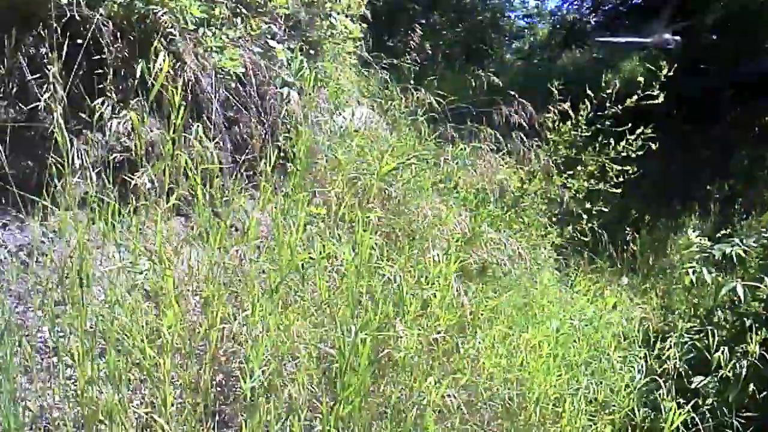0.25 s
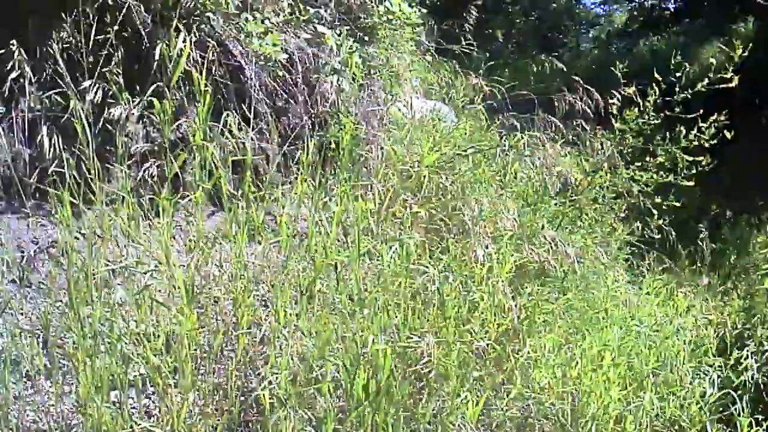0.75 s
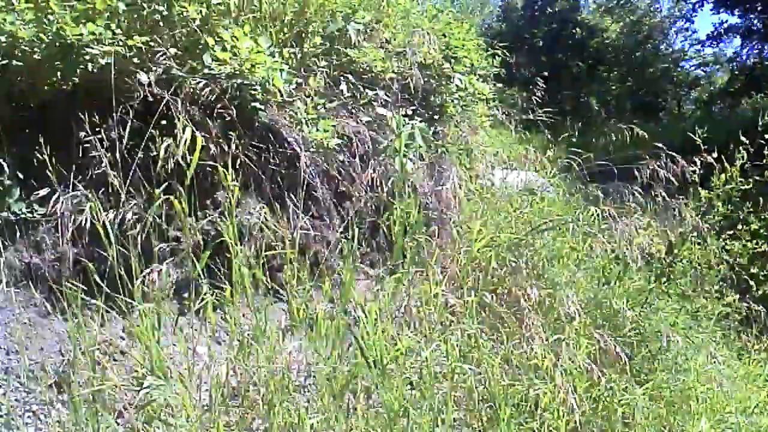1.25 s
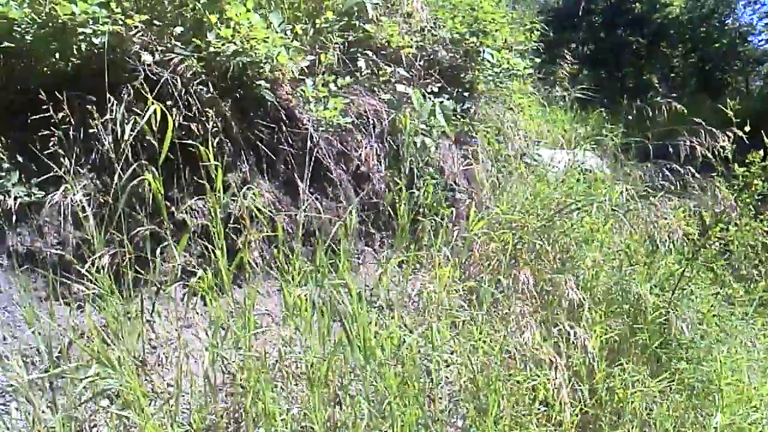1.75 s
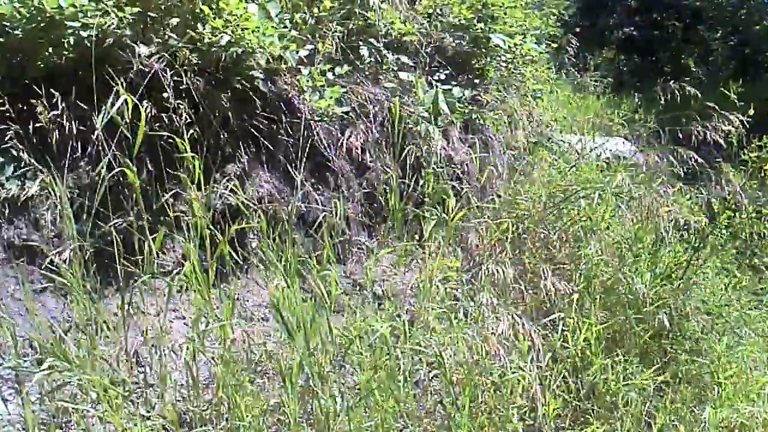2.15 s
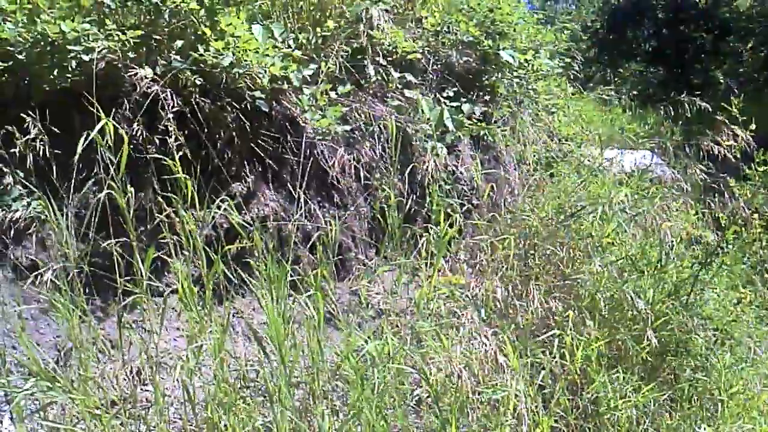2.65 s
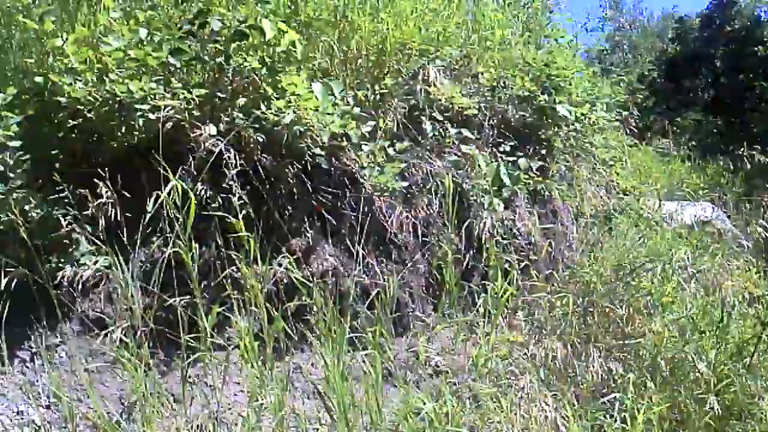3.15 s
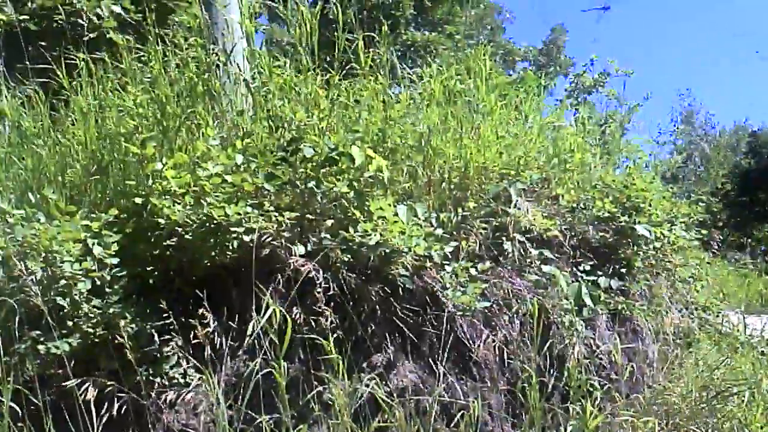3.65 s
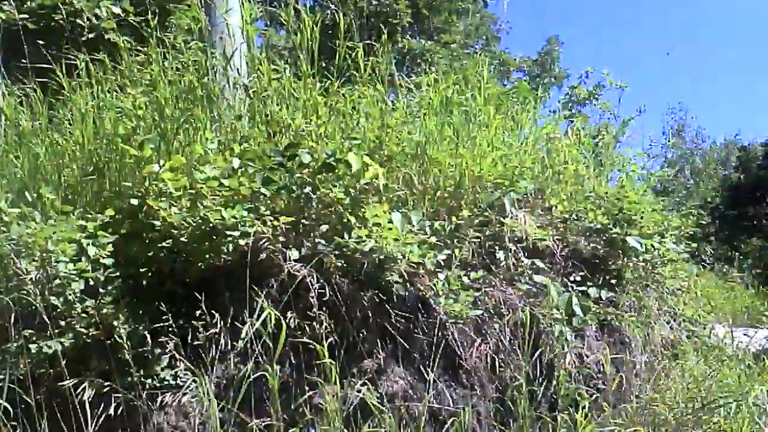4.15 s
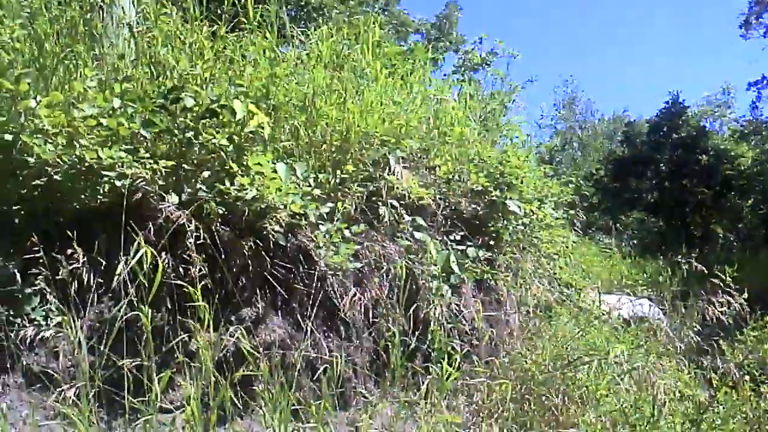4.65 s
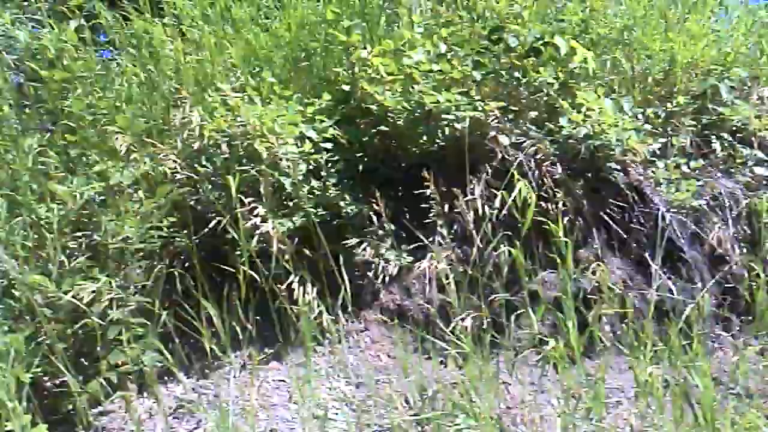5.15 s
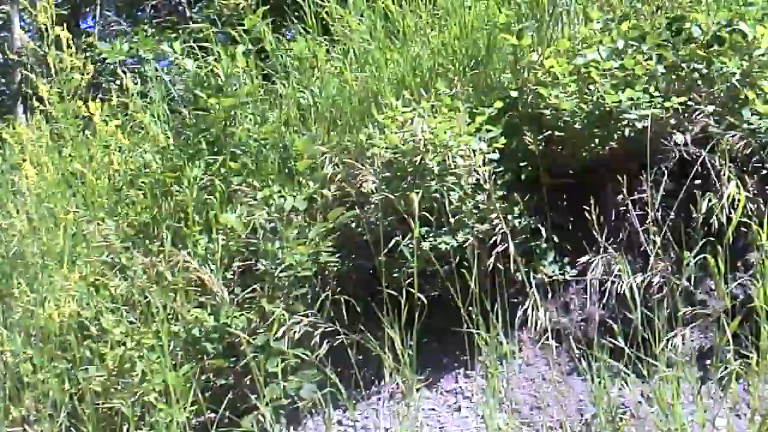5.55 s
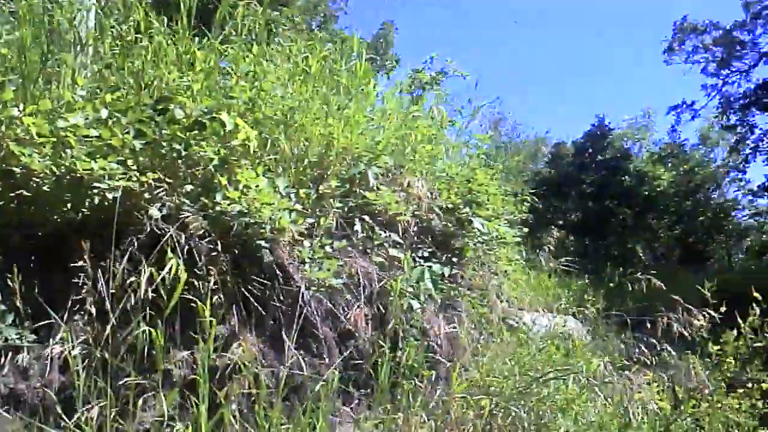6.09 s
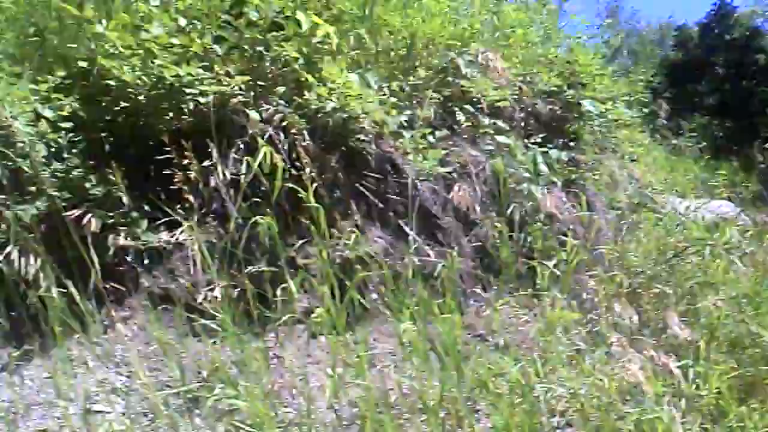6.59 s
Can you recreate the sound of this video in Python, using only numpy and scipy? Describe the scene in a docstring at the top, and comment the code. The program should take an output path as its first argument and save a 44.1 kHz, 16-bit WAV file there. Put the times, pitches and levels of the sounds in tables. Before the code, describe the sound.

Someone walks slowly through tall grass close to the microphone. Blades swish against trouser legs, stems crunch underfoot and dry stalks snap, mostly in the first two seconds. The steps pause while two small birds twitter faintly in the trees, then resume more softly. A faint machine hum lies under the outdoor air, and puffs of wind rumble on the microphone, strongest at the very end.

```python
"""Slow steps through tall grass

Summer grass swishes and crackles against the legs, feet crush stems, and dry stalks snap.
Two small birds twitter in the trees, and a faint machine hum lies under the outdoor air.
Puffs of wind rumble on the microphone, strongest at the very end."""
import sys
import numpy as np
from scipy import signal
from scipy.fft import rfft, irfft, next_fast_len
from scipy.io import wavfile
from scipy.ndimage import uniform_filter1d, map_coordinates

SR = 44100
rng = np.random.default_rng(int(sys.argv[2]) if len(sys.argv) > 2 else 0)


def generate_wav(sig):
    """Save sig (samples, or channels by samples) to the path in sys.argv[1] as 16-bit PCM at SR."""
    pcm = np.round(np.clip(np.atleast_2d(sig).T, -1, 1) * 32767).astype(np.int16)
    wavfile.write(sys.argv[1], SR, pcm)


N = 300850
TOP_HZ = 16000  # the highest sound let through

# how alike left and right are, where 1 means the same: frequency_hz, likeness
STEREO_LIKENESS = [(100, 1), (500, .975), (1000, .99), (2000, .997), (4000, .89), (8000, .86), (15000, .88)]
# the tone of the outdoor air: frequency_hz, gain_db
AIR_SPECTRUM = [(8, 13.5), (30, 1.5), (70, 6), (130, 1.5), (260, -1.5), (480, 0.5), (750, -6.5),
                (1400, -11.5), (2400, -16), (4000, -15.5), (6000, -19.5), (9000, -22.5), (16000, -27.5)]
# the motor's steady tones: pitch_hz, level_db
HUM_TONES = [(26.2, -54), (58.8, -48), (78.6, -60.5), (131, -58.5), (157.3, -63), (183.5, -68),
             (209.7, -65.5), (223.8, -65), (262, -71), (335.5, -70), (822, -76.5), (1467, -78)]
# one more motor tone that comes and goes: time_s, level_db
DRONE_LEVELS = [(0.0, -53.5), (0.46, -50), (0.8, -67.5), (2.07, -51), (2.37, -55.5), (3.22, -49),
                (3.87, -69), (4.02, -53), (4.35, -66), (5.08, -49.5), (5.59, -62), (5.72, -55.5),
                (6.65, -50.5)]
# the light breeze under the puffs: time_s, level_db
BREEZE_LEVELS = [(0, -47.5), (1.5, -46.5), (3.3, -50), (4.5, -53.5), (4.9, -58), (5.8, -43.5),
                 (6.82, -47.5)]
# puffs of wind: peak_s, rise_s, hold_s, fall_s, level_db
WIND_PUFFS = [(.76, .2, 0.21, 0.39, -40), (4.28, 0.42, 0.24, .2, -47), (5.16, .11, 0.18, 0.18, -33),
              (5.45, 0.067, .02, 0.18, -34), (5.73, 0.12, 0.025, 0.078, -34), (6.35, 0.13, 0.016, .1, -38),
              (6.8, 0.12, 0.045, 0.11, -16)]
# the deep rumble of wind on the microphone: frequency_hz, gain_db
WIND_SPECTRUM = [(4, -22), (12, -5), (28, 0), (48, -4), (80, -17), (140, -31), (400, -50), (1500, -72),
                 (5000, -110)]
# how long the trees' echo takes to fade by 60 dB: frequency_hz, fade_s
TREE_ECHO = [(500, .3), (4000, 0.4), (10000, 0.34)]
# the songbird's syllables, by name: length_s, pitches_hz (evenly spaced in time)
BIRD_SYLLABLES = {"chip": (.026, [5050, 4680, 4270]), "swoop": (.056, [5800, 5300, 3500]),
                  "lift": (.046, [3450, 4020, 4280]), "tsee": (.042, [6900, 5800, 5540, 5540]),
                  "tew": (.05, [4700, 4280, 3200]), "whistle": (.058, [4850, 5030, 4970]),
                  "pip": (.03, [5900, 6200, 6100]), "peep": (.025, [6200, 6450, 6550]),
                  "tsip": (.045, [5850, 5170, 4800])}
# its song, in runs of one syllable: start_s, count, period_s, level_db, syllable
BIRD_SONG = [(1.003, 2, .115, -50.5, "pip"), (2.753, 3, 0.2, -53, "chip"), (2.789, 3, 0.2, -53.5, "swoop"),
             (2.844, 3, .205, -56.5, "lift"), (3.406, 2, 0.11, -53, "tsee"), (3.585, 3, 0.16, -56, "tew"),
             (3.649, 2, 0.16, -53, "whistle"), (3.897, 1, 0, -56, "peep"), (4.463, 2, .177, -58.5, "tsip"),
             (5.44, 1, 0, -57, "pip")]
# a farther bird's sliding notes: start_s, middle_hz, glide_octaves, level_db
BIRD_SLURS = [(.279, 3730, -0.49, -60.5), (.375, 3470, .45, -57), (.645, 1900, -.08, -58),
              (2.482, 3200, -.35, -58.5), (2.61, 3120, .38, -58.5), (3.31, 3490, -.3, -63),
              (3.473, 3460, .2, -62), (3.496, 2920, -.16, -60.5), (4.94, 3800, 0.34, -61),
              (5.019, 3170, -0.65, -58), (5.14, 2950, .6, -58.5), (5.179, 3156, -.1, -56),
              (5.295, 3700, -.35, -59.5), (5.385, 3600, .3, -62), (5.53, 3840, -.35, -61),
              (6.006, 4320, -.28, -58), (6.175, 3200, .55, -58), (6.238, 2980, -.42, -60)]
# leaves brushing trouser cloth: peak_s, rise_s, hold_s, fall_s, level_db
CLOTH_GRAZES = [(1.9, 0.66, 0.54, 0.15, -55), (2.82, 0.21, 0.034, 0.22, -62), (3.4, 0.61, .1, .6, -70.5),
                (4.17, .28, .15, 0.12, -60), (4.79, .1, 0.098, 0.13, -54.5),
                (5.27, 0.79, 0.019, 0.45, -57.5), (6.69, 0.1, 0.011, 0.067, -53.5)]
# the tone of leaves on cloth: frequency_hz, gain_db
CLOTH_SPECTRUM = [(200, -35), (1000, -8.5), (1800, -9.5), (3200, -14.5), (4700, -5), (6300, -2.5),
                  (7200, -6), (8200, -6), (9800, -2.5), (10800, -5), (12500, -7), (16000, -7)]
# a leg sweeps the grass as the foot lands: peak_s, rise_s, hold_s, fall_s, swish_db, crush_db
STEPS = [(0, .1, 0.093, .22, -50.5, -52.5), (0.716, 0.048, 0.09, 0.23, -40, -46.5),
         (1.445, 0.41, 0.081, 0.45, -43.5, -48.5), (1.922, 0.18, 0.034, 0.36, -49, -58.5),
         (4.814, 0.1, 0.026, 0.23, -55, -55), (5.298, 0.92, 0.16, 0.69, -65.5, -60),
         (5.729, 0.061, 0.17, 0.053, -51.5, -63.5), (6.72, 0.28, 0.16, .2, -58, -70)]
# the bright swish of grass blades: frequency_hz, gain_db
BLADE_SPECTRUM = [(200, -42), (1000, -19.5), (2200, -10), (3800, -7), (5200, -3), (6800, -1), (8500, -3),
                  (10500, -4.5), (13000, -6), (16000, -13)]
# the dull crunch of stems underfoot: frequency_hz, gain_db
CRUNCH_SPECTRUM = [(80, -25), (250, -2.5), (500, -0.5), (1100, -3), (2000, -5), (3500, -13.5), (8000, -31),
                   (16000, -50)]
# stalks breaking: start_s, crack_db, knock_db
STALK_SNAPS = [(.0403, -21, -54), (0.1817, -36, -28.5), (.556, -27, -60), (.6432, -31, -42),
               (.843, -16, -47), (1.245, -36, -29.5), (1.2975, -15.5, -44), (1.4802, -5, -20),
               (1.543, -13, -48), (2.0106, -17, -43), (2.072, -42, -36), (2.53, -30, -62),
               (4.1815, -26, -37), (5.7248, -20, -41), (5.83, -18.5, -47), (5.8485, -15.5, -46),
               (6.013, -28.5, -60), (6.749, -24, -56)]
# the tone of a stalk's crack: frequency_hz, gain_db
CRACK_SPECTRUM = [(150, -45), (400, -16), (1000, -11), (3000, -7), (7000, -1), (12000, 0), (16000, 0)]
# the ringing tones of a hollow stem: pitch_hz, level_db, fade_s (to fall by 60 dB)
STEM_TONES = [(484, -14, .012), (815, -3.5, 0.0083), (1230, 1, 0.0098), (2160, -6, 0.018), (3230, -6, 0.01)]


def amp(db):
    """Turns decibels into a number to multiply by."""
    return 10 ** (np.asarray(db) / 20)


def unit(x):
    """Scales a signal to an average (rms) level of 1."""
    return x / np.sqrt(np.mean(x ** 2) + 1e-20)


def along(points, hz):
    """Reads between (frequency_hz, value) rows on a log frequency scale."""
    frequencies, values = np.transpose(points)
    return np.interp(np.log(hz + 1), np.log(frequencies + 1), values)


def curve(rows):
    """Joins (time_s, value) rows into one value per sample."""
    return np.interp(np.arange(N) / SR, *np.transpose(rows))


def wobble(rate):
    """A smooth curve through `rate` random values a second."""
    return map_coordinates(rng.standard_normal(int(N * rate / SR) + 4), [np.arange(N) * rate / SR])


def swells(rows, range_db=20):
    """A gain curve of swells: each climbs range_db over its rise, holds, and drops that over its fall."""
    t = np.arange(N) / SR
    power = np.zeros(N)
    for peak_s, rise_s, hold_s, fall_s, db in rows:
        before = np.maximum(peak_s - t, 0) / rise_s
        after = np.maximum(t - peak_s - hold_s, 0) / fall_s
        power += amp(db - range_db * (before + after)) ** 2
    return np.sqrt(power)


def filtered(x, response):
    """Multiplies each frequency in x by response(hz)."""
    size = next_fast_len(N + SR // 2)
    return irfft(rfft(x, size) * response(np.fft.rfftfreq(size, 1 / SR)), size)[..., :N]


def coloured(x, spectrum):
    """Shapes the tone of x with a spectrum table, then sets its level to 1."""
    return unit(filtered(x, lambda hz: amp(along(spectrum, hz))))


def add(track, start_s, sound):
    """Mixes a sound into a track at a given time."""
    part = track[..., max(round(start_s * SR), 0):][..., :sound.shape[-1]]
    part += sound[..., :part.shape[-1]]


def spread(pair):
    """Turns two unrelated signals into left and right, nearly alike in the bass."""
    turn = lambda hz: np.arccos(np.clip(along(STEREO_LIKENESS, hz), -1, 1)) / 2
    mid, side = filtered(pair, lambda hz: np.array([np.cos(turn(hz)), np.sin(turn(hz))]))
    return np.array([mid + side, mid - side])


def air():
    """The far, even wash of the countryside."""
    level = amp(-53 + 1.08 * wobble(2.73))
    return spread(level * coloured(rng.standard_normal((2, N)), AIR_SPECTRUM))


def hum(drone_hz=112.5):
    """A motor's low tones waver slowly in strength, and one comes and goes."""
    t = np.arange(N) / SR
    tone = lambda hz: np.sqrt(2) * np.sin(2 * np.pi * (hz * t + rng.random()) + 0.34 * wobble(3.06))
    steady = sum(amp(db + 1.63 * wobble(2.103)) * tone(hz) for hz, db in HUM_TONES)
    return steady + amp(curve(DRONE_LEVELS)) * tone(drone_hz)


def wind():
    """Swirls of air push on the microphone, as hard as the breeze and the puffs blow."""
    swirls = coloured(rng.standard_normal(N), WIND_SPECTRUM)
    own_level = np.sqrt(np.abs(uniform_filter1d(swirls ** 2, size=SR // 12)))
    strength = np.hypot(amp(curve(BREEZE_LEVELS)), swells(WIND_PUFFS))
    return strength * swirls / own_level  # dividing evens out the noise's own ups and downs


def trees(sound):
    """Trunks and leaves scatter a sound into a soft echo."""
    hz, t, noise = signal.stft(rng.standard_normal((2, SR // 2)), SR, nperseg=256)
    fade = amp(-60 * t / along(TREE_ECHO, hz)[:, None])
    _, tail = signal.istft(noise * fade, SR, nperseg=256)
    return signal.fftconvolve(sound[None], tail / np.linalg.norm(tail[0]), axes=1)[:, :N]


def bird_notes(slur_s=0.048):
    """Lists both birds' notes: start_s, length_s, pitches_hz, level_db."""
    notes = [(start_s, slur_s, hz * 2 ** (octaves * np.array([-0.5, 0, 0.5])), db)
             for start_s, hz, octaves, db in BIRD_SLURS]
    for start_s, count, period_s, db, name in BIRD_SONG:
        length_s, pitches = BIRD_SYLLABLES[name]
        for k in range(round(count)):
            tuning = 1 + 0.0117 * rng.normal()  # each repeat is a little higher or lower
            notes.append((start_s + k * period_s, length_s, np.array(pitches) * tuning, db))
    return notes


def birds(near_db=-51.5, direct_db=1, far_fade=0.67):
    """Each note is a quivering whistle that bends through its pitches and echoes in the trees."""
    song, direct = np.zeros(N), np.zeros(N)
    quiver = 1 + 0.017 * wobble(700)
    for start_s, length_s, pitches, db in bird_notes():
        progress = np.linspace(0, 1, int(length_s * SR))
        bend = np.polyfit(np.linspace(0, 1, len(pitches)), pitches, len(pitches) - 1)
        pitch_hz = np.polyval(bend, progress) * quiver[round(start_s * SR):][:len(progress)]
        level = amp(db) * np.sqrt(np.abs(np.sin(np.pi * progress)))
        whistle = level * np.sin(2 * np.pi * np.cumsum(pitch_hz) / SR)
        add(song, start_s, whistle)
        # fainter notes are farther off, so more of their sound is echo
        add(direct, start_s, whistle * amp((db - near_db) * far_fade))
    flutter = amp(1.24 * wobble(200))
    return amp(direct_db) * direct * flutter + spread(trees(song * flutter))


def crackle(rate, scatter_db, life_s):
    """Catching and slipping makes about `rate` tiny bursts a second, most weak and a few strong."""
    sizes = amp(scatter_db * np.minimum(rng.exponential(size=N), 5))
    slips = sizes ** 2 * (rng.random(N) < rate / SR)
    energy = signal.lfilter([1], [1, -np.exp(-1 / (life_s * SR))], slips)  # each burst dies away
    return unit(np.sqrt(energy) * rng.standard_normal((2, N)))


def friction(sweep, spectrum, scatter_db, hiss_db, sheen_db):
    """Leaves catch and slip: a harder sweep makes more contacts and a smoother, brighter hiss."""
    effort = np.sqrt(sweep / sweep.max())
    contacts_per_s = 700 + 3000 * effort
    ticks = crackle(contacts_per_s, scatter_db, life_s=0.00077)
    ticks *= np.sqrt(contacts_per_s.mean() / contacts_per_s)  # denser without getting louder
    rub = coloured(amp(hiss_db) * rng.standard_normal((2, N)) + ticks, spectrum)
    sheen = filtered(rub, lambda hz: (hz / TOP_HZ) ** 6)  # only the highest treble
    level = amp(6 + wobble(55)) * sweep
    return spread(level * (rub + amp(sheen_db) * effort ** 2 * sheen))


def grass(stir_db=-70):
    """Blades whip past each leg; between steps they only stir and graze the cloth."""
    sweep = swells([(*timing, swish_db) for *timing, swish_db, _ in STEPS])
    blades = friction(sweep, BLADE_SPECTRUM, scatter_db=5, hiss_db=-1, sheen_db=3)
    graze = np.hypot(swells(CLOTH_GRAZES), amp(stir_db))
    return blades + friction(graze, CLOTH_SPECTRUM, scatter_db=6, hiss_db=-5.5, sheen_db=-11)


def tread():
    """With each step the sole crushes matted stems into a dull, coarse crunch."""
    weight = swells([(*timing, crush_db) for *timing, _, crush_db in STEPS])
    crunch = crackle(rate=1100, scatter_db=3, life_s=0.0011)
    return spread(weight * coloured(crunch, CRUNCH_SPECTRUM))


def snaps(crack_s=0.003, fray_s=0.02):
    """A dry stalk breaks with a sharp crack, frays for a moment, and its hollow stem knocks."""
    t = np.arange(SR // 25) / SR
    cracks, knocks = np.zeros(N), np.zeros(N)
    fracture = amp(-60 * t / crack_s) + amp(-25 - 60 * t / fray_s)
    for start_s, crack_db, knock_db in STALK_SNAPS:
        add(cracks, start_s, amp(crack_db) * fracture * np.tanh(rng.standard_normal(len(t))))
        tunings = np.exp(0.1 * rng.normal(size=len(STEM_TONES)))  # no two stems ring alike
        ring = sum(amp(db - 60 * t / fade_s) * np.sin(2 * np.pi * hz * tuning * t)
                   for (hz, db, fade_s), tuning in zip(STEM_TONES, tunings))
        add(knocks, start_s, amp(knock_db) * ring / np.abs(ring).max())
    return filtered(cracks, lambda hz: amp(along(CRACK_SPECTRUM, hz))) + knocks


def scene():
    """Grass and steps close by, birds far off, and air, hum and wind underneath."""
    return grass() + tread() + snaps() + birds() + air() + hum() + wind()


def record(dry):
    """Above the bass, left trails right by about one sample; nothing above TOP_HZ gets through."""
    bass_hz = 110
    lag_s = lambda hz: hz ** 2 / (hz ** 2 + bass_hz ** 2) / SR
    sides = np.array([[-1], [1]])  # left later, right earlier
    return filtered(dry, lambda hz: (hz < TOP_HZ) * np.exp(1j * np.pi * hz * lag_s(hz) * sides))


dry = scene()
out = record(dry)
generate_wav(out)
```